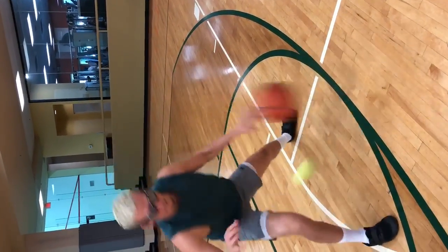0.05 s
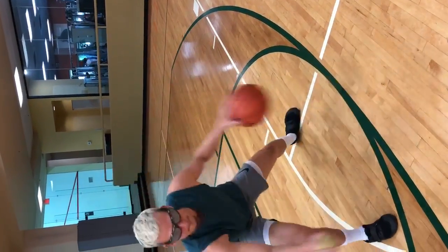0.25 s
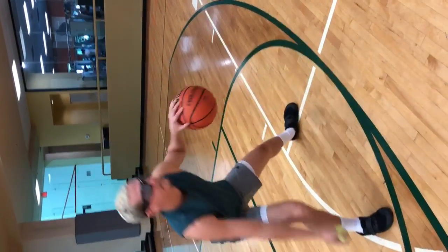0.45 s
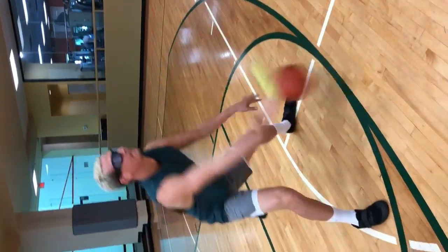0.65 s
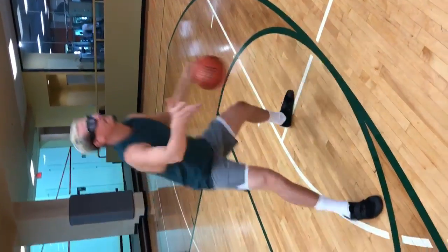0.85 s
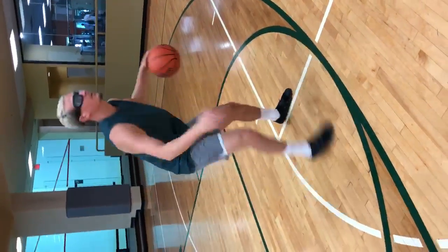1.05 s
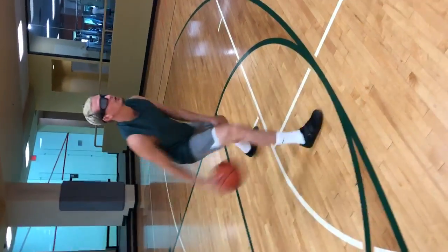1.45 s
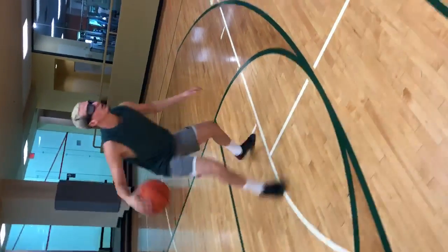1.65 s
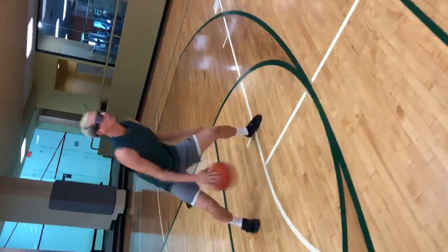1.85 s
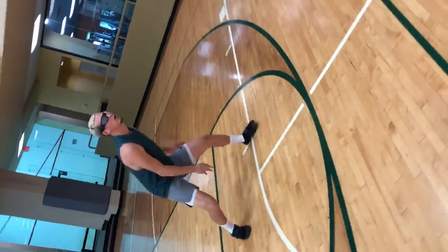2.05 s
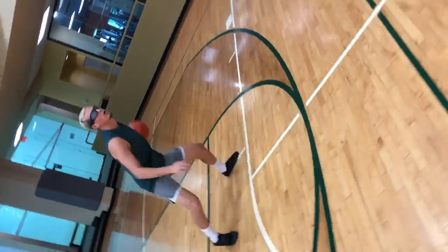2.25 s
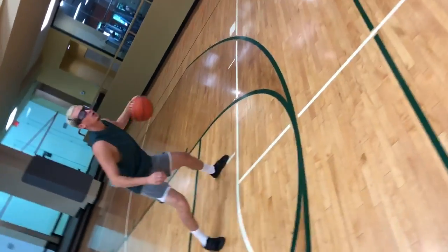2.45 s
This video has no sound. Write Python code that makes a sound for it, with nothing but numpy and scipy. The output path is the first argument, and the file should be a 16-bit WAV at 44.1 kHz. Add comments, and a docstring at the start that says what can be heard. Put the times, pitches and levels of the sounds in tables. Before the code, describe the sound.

Four basketball bounces slap and thump on wood, each booming through a large gym.

```python
"""A large gym rings from an earlier bounce, over ventilation; a basketball is then dribbled four times.
Each bounce, a few metres off, is a slap, a falling thump of the sprung wooden floor and a knock as the
ball leaves; the air in the ball pings faintly. Ceiling, walls and beams answer and the hall booms on.
Shoes and hands tap between the bounces; soles scuff near the end."""
import sys
import numpy as np
from scipy import signal
from scipy.fft import rfft, irfft
from scipy.io import wavfile

SR = 44100
rng = np.random.default_rng(int(sys.argv[2]) if len(sys.argv) > 2 else 0)


def log_audio(samples):
    """Write samples as a 16-bit WAV file to the path given in sys.argv[1]."""
    # one column per channel
    frames = np.atleast_2d(samples).T
    # limit to full scale, then quantise
    limited = np.clip(frames, -1, 1)
    pcm = np.round(limited * 32767).astype(np.int16)
    wavfile.write(sys.argv[1], SR, pcm)


N = 110250
LEAD_S = 1  # pre-roll before t = 0
LEAD = int(LEAD_S * SR)
AGE_S = np.arange(int(.6 * SR)) / SR

# Bounces; only the first one's tail is heard. Levels are relative.
# t/s, thump/dB, slap/dB, upper board mode f/Hz, level/dB, lower board mode f/Hz, level/dB,
# dip f/Hz, treble/dB, lift-off/dB, echo/dB, hall/dB
BOUNCE_EVENTS = [(-.36, 1, -3, 1410, -16, 910, -22, 9000, 0, 2.5, -18, 0),
                 (.2250, 0, 5, 1450, -8.5, 920, -18.5, 6030, -3, 2, -11.5, -1),
                 (.7917, -1, -2.5, 1190, -9, 520, -44, 12800, 2.5, 1, -11, -2.5),
                 (1.4783, -0.5, -1.5, 1415, -8, 730, -19, 7550, 1.5, -5.5, -10.5, -1.5),
                 (2.0300, -2.5, -2, 1494, -11, 1076, -14, 16000, 2, -5, -14, -2.5)]
# Footfalls and hands on the ball: t/s, relative thud/dB, relative tap/dB, treble/dB
TAP_EVENTS = [(0.563, -34, -35, -3), (0.682, -28.5, -39, -6), (1.251, -29.5, -45, 12),
              (1.359, -36, -36.5, -2), (1.91, -64, -30.5, 7.5), (2.2907, -27.5, -22, 6)]
# Shoe scuffs: centre t/s, half-width/s, level/dB
SCUFF_EVENTS = [(1.918, 0.052, -49.5), (2.341, 0.032, -48.5), (2.457, 0.044, -46.5)]
# Spectra of ventilation, slap, lift-off rub, tap and scuff: f/Hz, level/dB
VENT_SPECTRUM = [(20, -4), (40, -5), (90, -10.5), (200, -4.5), (400, -10), (1300, -16), (3000, -25),
                 (6000, -32.5), (11000, -40), (16000, -48.5)]
SLAP_SPECTRUM = [(150, 1.5), (500, 4), (900, 0.5), (1500, 6), (2000, 8), (2700, 3.5), (3200, 2),
                 (3950, 0.5), (4700, -2.5), (8000, -7), (11500, -9), (16000, -19)]
RUB_SPECTRUM = [(200, -18.5), (450, 8), (900, -4), (1400, -2), (1900, -27.5), (4500, -17), (8000, -21.5),
                (16000, -66)]
TAP_SPECTRUM = [(100, 2), (400, 11), (1600, 4.5), (3500, -8), (8000, -25), (13000, -22), (16000, -29)]
SCUFF_SPECTRUM = [(300, -4), (1500, 14), (4000, 0), (11000, -11), (16000, -28)]
# Hall reverberation: f/Hz, level/dB, t60/s
HALL_BANDS = [(40, -19, 1.2), (68, -3, 1.44), (115, -1.5, 1.21), (184, -6, 1.48), (252, -1.5, 2.02),
              (387, -2, 1.5), (698.4, 0.5, 3.5), (1230, 0.5, 1.54), (1960, -5.5, 2.17), (3140, -4.5, 1.33),
              (5100, -4.5, 0.87), (9000, -12.5, 1.18), (16000, -17, 0.36)]
# Modes of the ball's air and skin: f/Hz, level/dB, t60/s
BALL_MODES = [(920, 17, 0.44), (1220, -25.5, .55), (1295, 0, 0.32), (1350, -5, 0.34), (2040, -31, .45),
              (3010, 9, 0.57), (4381, -4, 0.39), (4730, -15, 0.23), (5350, 0, 0.15), (6046, -9, .3),
              (6200, -16, .3)]
# Side-wall reflections, relative to the ceiling's: lag/s, level/dB
WALL_ECHOES = [(.005, -11), (.020, -5), (.024, -12.5), (.040, -10), (.055, -14)]


def undb(db):
    """Decibels to gain."""
    return 10 ** (np.asarray(db) / 20)


def at_hz(table, hz, column=1):
    """Table column interpolated over log frequency."""
    rows = np.array(table, float)
    return np.interp(np.log(hz + 1e-9), np.log(rows[:, 0]), rows[:, column])


def colour(x, spectrum, treble_db=0, shelf_hz=4440, size=4096):
    """Unit-power minimum-phase filter, then a gain: treble_db below the shelf, twice the dB above."""
    hz = np.fft.rfftfreq(size, 1 / SR)
    gain = undb(at_hz(spectrum, hz))
    shelf = undb(treble_db * (2 - 1 / (1 + (hz / shelf_hz) ** 4)))
    gain = gain / np.sqrt(np.mean(gain ** 2)) * shelf
    cepstrum = irfft(np.log(gain))
    fold = np.r_[1, np.full(size // 2 - 1, 2), 1, np.zeros(size // 2 - 1)]
    impulse = irfft(np.exp(rfft(cepstrum * fold)))
    return signal.fftconvolve(x, impulse)[:len(x)]


def fade(t_s, t60_s):
    """Exponential decay, 60 dB per t60_s."""
    return np.exp(-np.log(1000) * np.maximum(t_s, 0) / t60_s)


def ring(hz, t60_s):
    """One struck mode."""
    return np.cos(2 * np.pi * hz * AGE_S) * fade(AGE_S, t60_s)


def bell(t_s, centre_s, half_width_s):
    """Gaussian envelope."""
    return np.exp(-((t_s - centre_s) / half_width_s) ** 2)


def add(track, start_s, sound):
    """Mix a sound into a track that has pre-roll."""
    i = int((start_s + LEAD_S) * SR)
    part = sound[:max(len(track) - i, 0)]
    track[i:i + len(part)] += part


def hall_tail(early_db=-9, onset_s=.050, rise_s=.007):
    """Diffuse response in half-octave bands; swells about 50 ms after impact, as the ceiling answers."""
    t_s = np.arange(int(1.6 * SR)) / SR
    octave = np.log2(np.fft.rfftfreq(len(t_s), 1 / SR) + 1)
    noise = rfft(rng.standard_normal(len(t_s)))
    build = undb(early_db) + (1 - undb(early_db)) * (1 + np.tanh((t_s - onset_s) / rise_s)) / 2
    out = 0
    for centre_hz in 45 * 2 ** np.arange(0, 9, .5):
        share = np.maximum(1 - 2 * np.abs(octave - np.log2(centre_hz)), 0)
        band = irfft(noise * share) * build * fade(t_s, at_hz(HALL_BANDS, centre_hz, column=2))
        norm = np.sqrt(np.mean(share ** 2) / np.sum(band ** 2))
        out = out + band * norm * undb(at_hz(HALL_BANDS, centre_hz))
    return out


def ventilation(level_db=-43):
    """Steady rush of air."""
    return undb(level_db) * colour(rng.standard_normal(LEAD + N), VENT_SPECTRUM)


def disperse(x, bass_lag_s=.006117, corner_hz=436.6):
    """Bending waves in the boards: highs arrive first, lows trail."""
    hz = np.fft.rfftfreq(2 * len(x), 1 / SR)
    phase = 2 * np.pi * bass_lag_s * corner_hz * np.arctan(hz / corner_hz)
    return irfft(rfft(x, 2 * len(x)) * np.exp(-1j * phase))[:len(x)]


def slap(treble_db, gain_db=3.48):
    """First contact: a click that chirps downward."""
    click = undb(gain_db) * (AGE_S == 0)
    return -disperse(colour(click, SLAP_SPECTRUM, treble_db))


def ball_ping(gain_db=-60.5):
    """The ball's air and skin ring."""
    return undb(gain_db) * sum(undb(db) * ring(hz, t60_s) for hz, db, t60_s in BALL_MODES)


def double_contact(x, dip_hz, second_tap_db=-9.5):
    """The skin touches down in two close taps, half a period apart at dip_hz, which dips the treble."""
    hz = np.fft.rfftfreq(len(x), 1 / SR)
    comb = 1 + undb(second_tap_db) * np.exp(-1j * np.pi * hz / dip_hz)
    return irfft(rfft(x) * comb, len(x))


def board(upper_hz, upper_db, lower_hz, lower_db, rise_s=.00041):
    """Two short modes of the board under the ball."""
    modes = undb(upper_db) * ring(upper_hz, t60_s=.012) + undb(lower_db) * ring(lower_hz, t60_s=.024)
    return -disperse(modes * (1 - np.exp(-AGE_S / rise_s)))


def crackle(treble_db, gain_db=-20.02):
    """The pebbled skin flattens against the varnish."""
    grit = undb(gain_db) * rng.standard_normal(len(AGE_S)) * fade(AGE_S, t60_s=.021)
    return disperse(colour(grit, SLAP_SPECTRUM, treble_db))


def thump(gain_db=-7.5, start_hz=322.3, end_hz=84.5, glide_s=.0066, delay_s=.00065, rise_s=.016):
    """The floor bends under the ball; slower low waves arrive last, so the pitch falls."""
    t_s = np.maximum(AGE_S - delay_s, 0)
    hz = end_hz + (start_hz - end_hz) * np.exp(-t_s / glide_s)
    phase = 2 * np.pi * np.cumsum(hz * (t_s > 0)) / SR
    swell = np.where(t_s < rise_s, np.sqrt(t_s / rise_s), bell(t_s, rise_s, half_width_s=.0076))
    return undb(gain_db) * swell * np.cos(phase)


def lift_off(contact_s=.01, rub_db=-21, knock_db=-11, knock_hz=1284):
    """The skin snaps back as the ball leaves: a short rub and a hollow knock."""
    noise = colour(rng.standard_normal(len(AGE_S)), RUB_SPECTRUM)
    rub = noise * bell(AGE_S, contact_s, half_width_s=.0025)
    since_s = np.maximum(AGE_S - contact_s, 0)
    knock = np.sin(2 * np.pi * knock_hz * since_s) * fade(since_s, t60_s=.012)
    return undb(rub_db) * rub - undb(knock_db) * knock


def beam_echoes(gain_db=-12.5, onset_s=.061, rise_s=.0078, rate_per_s=780):
    """Cluster of separate reflections from roof beams and pillars."""
    since_s = np.maximum(AGE_S - onset_s, 0)
    hits = (rng.random(len(AGE_S)) < rate_per_s / SR) * rng.standard_normal(len(AGE_S))
    echoes = hits * (1 - np.exp(-since_s / rise_s)) * fade(since_s, t60_s=.09)
    return undb(gain_db) * echoes / np.sqrt(np.sum(echoes ** 2))


def bounces(smack_send_db=2, knocks_send_db=-8, scatter_db=-.5):
    """Each bounce lands on a new spot, so ceiling, walls and hall answer it differently."""
    out = np.zeros(LEAD + N)
    ping = ball_ping()
    for t_s, thump_db, slap_db, *modes, dip_hz, treble_db, lift_db, echo_db, hall_db in BOUNCE_EVENTS:
        smack = undb(slap_db) * (slap(treble_db) + ping)
        knocks = undb(slap_db) * (board(*modes) + crackle(treble_db)) + undb(lift_db) * lift_off()
        low = undb(thump_db) * thump()
        add(out, t_s, double_contact(smack, dip_hz) + knocks + low)
        far = undb(smack_send_db) * smack + undb(knocks_send_db) * knocks  # knocks carry less far
        ceiling_lag_s = .0510 - .0023 * t_s  # shorter as the player backs away
        for wall_lag_s, wall_db in [(0, 0), *WALL_ECHOES]:  # ceiling first
            scattered = far + undb(scatter_db) * crackle(treble_db)
            add(out, t_s + ceiling_lag_s + wall_lag_s, undb(echo_db + wall_db) * scattered)
        add(out, t_s, undb(hall_db) * signal.fftconvolve(far, beam_echoes()))
        add(out, t_s, signal.fftconvolve(undb(hall_db) * far + low, hall_tail()))
    return out


def taps(thud_hz=127, thud_peak_s=.0075):
    """Feet on the floor, hands on the ball: a soft thud and a noise burst each."""
    out = np.zeros(LEAD + N)
    thud = np.sin(2 * np.pi * thud_hz * AGE_S) * bell(AGE_S, thud_peak_s, thud_peak_s)
    for t_s, thud_db, tap_db, treble_db in TAP_EVENTS:
        burst = rng.standard_normal(len(AGE_S)) * fade(AGE_S, t60_s=.0071)
        tap = colour(burst, TAP_SPECTRUM, treble_db) / 2
        add(out, t_s, undb(thud_db) * thud + undb(tap_db) * tap)
    return out


def scuffs():
    """Soles brush the boards."""
    t_s = np.arange(-LEAD, N) / SR
    brush = sum(undb(db) * bell(t_s, centre_s, half_s) for centre_s, half_s, db in SCUFF_EVENTS)
    return brush * colour(rng.standard_normal(len(t_s)), SCUFF_SPECTRUM)


def scene():
    """Ventilation, ball and player in the gym; mono."""
    air = ventilation()
    player = taps() + scuffs()
    player_reverb = signal.fftconvolve(player, hall_tail())[:LEAD + N]
    return (air + bounces() + player + player_reverb)[None, LEAD:]


def record(dry, low_cut_hz=42, peak_limit=.95, top_hz=16300):
    """The microphone thins the deepest bass, rounds the peaks and cuts the top."""
    thin = signal.sosfilt(signal.butter(3, low_cut_hz, "high", fs=SR, output="sos"), dry)
    rounded = thin / (1 + (thin / peak_limit) ** 4) ** .25
    return signal.sosfilt(signal.ellip(8, .2, 70, top_hz, fs=SR, output="sos"), rounded)


dry = scene()
out = record(dry)
log_audio(out)
```